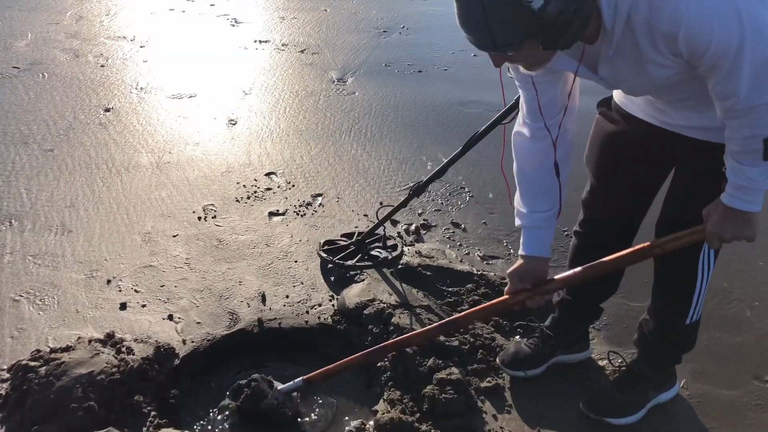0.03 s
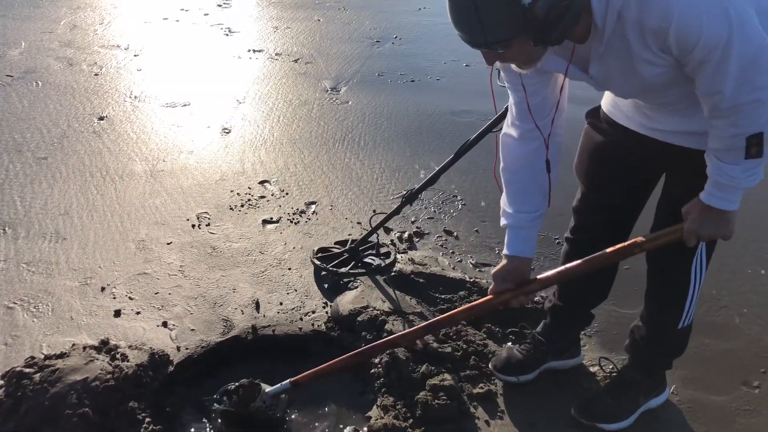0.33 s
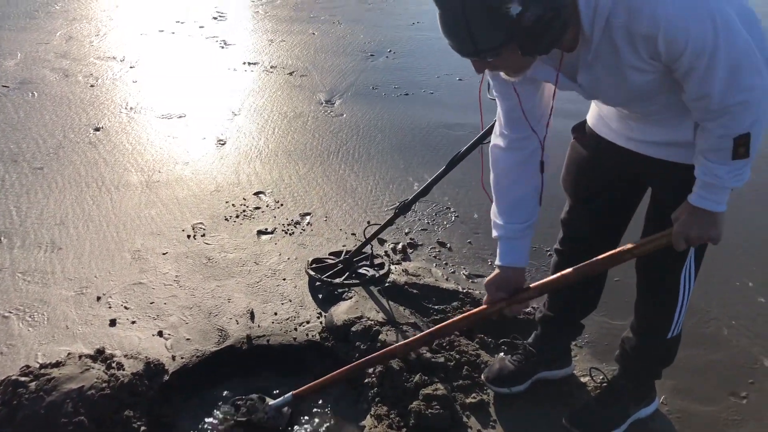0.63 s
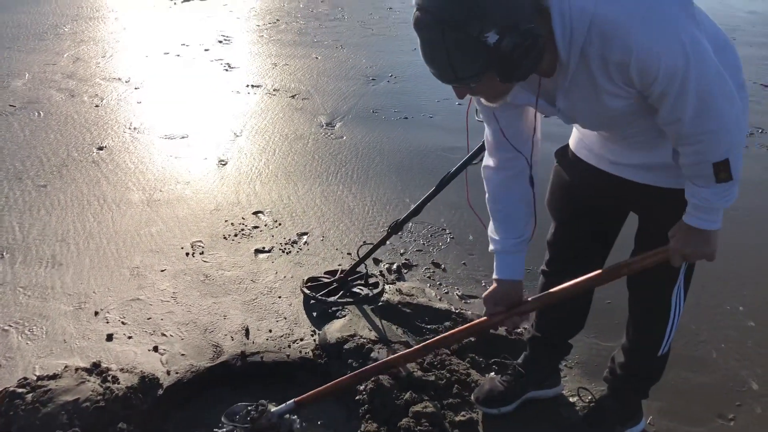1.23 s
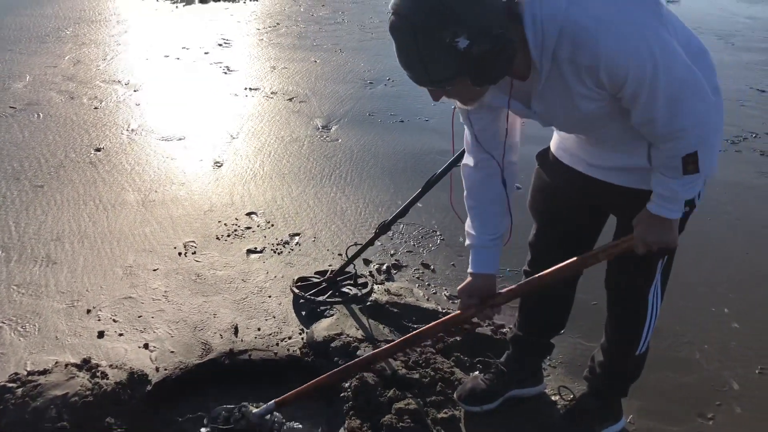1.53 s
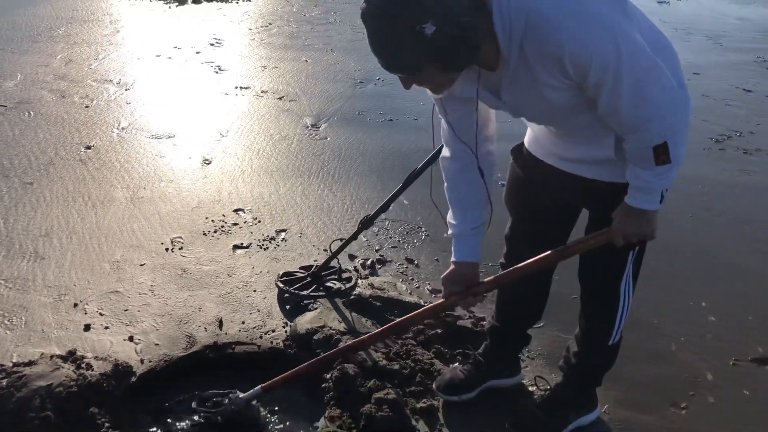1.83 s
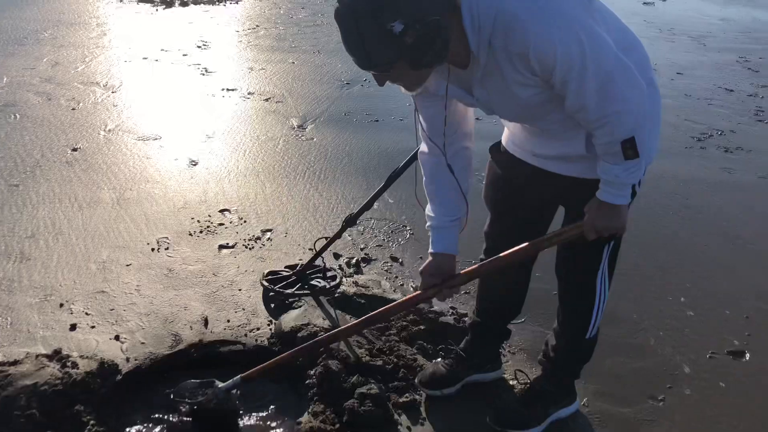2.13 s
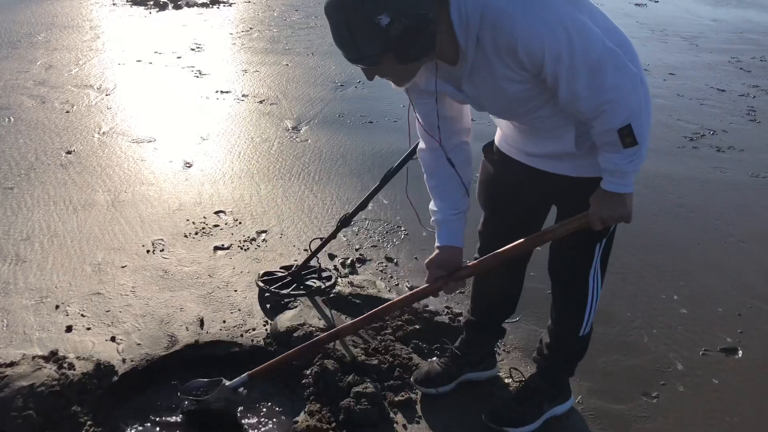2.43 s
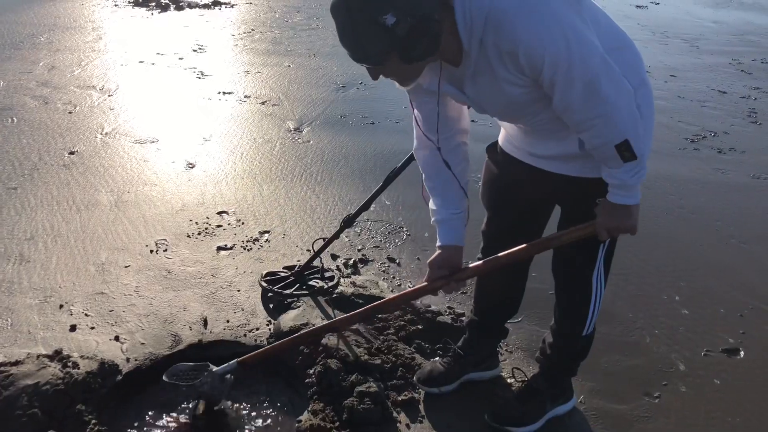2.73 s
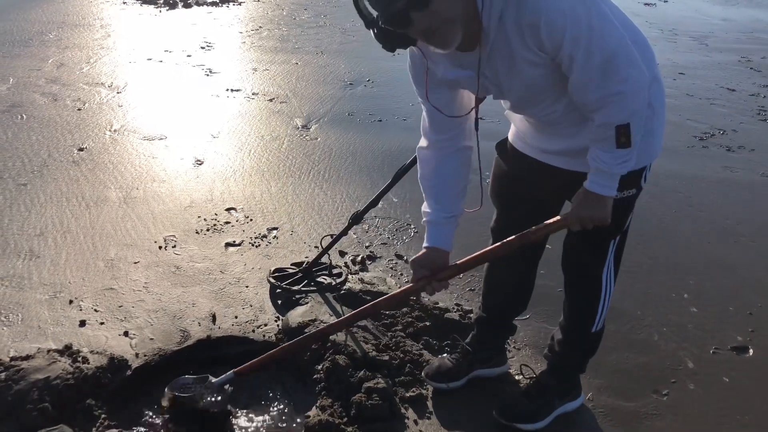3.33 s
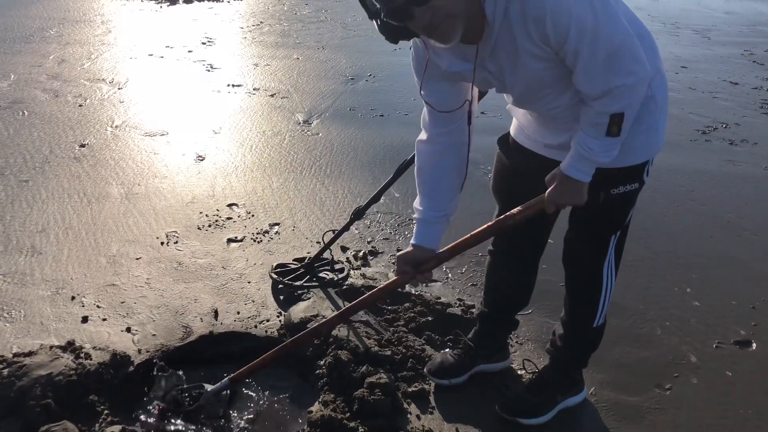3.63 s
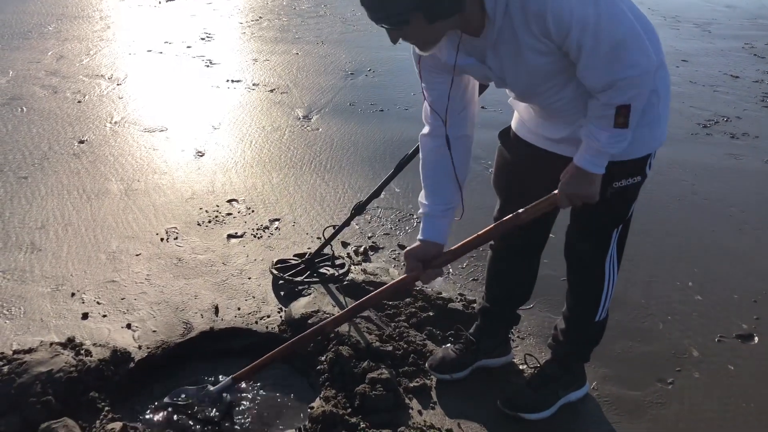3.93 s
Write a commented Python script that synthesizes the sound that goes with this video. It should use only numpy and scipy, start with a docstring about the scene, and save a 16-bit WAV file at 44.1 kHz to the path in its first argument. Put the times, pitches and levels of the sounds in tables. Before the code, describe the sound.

A scoop sloshes in a water-filled sand hole while wind buffets the microphone.

```python
"""On a beach, a long-handled scoop is shaken in a water-filled hole, about three strokes a second.
Each stroke throws a slosh of water and wet sand, made of hiss and tiny ringing bubbles.
Drops fall back into the puddle, and the scoop dribbles between strokes.
Gusts of wind rumble and thump on the microphone; surf washes steadily in the distance."""
import sys
import numpy as np
from scipy import signal
from scipy.fft import rfft, irfft
from scipy.io import wavfile
from scipy.ndimage import uniform_filter1d, minimum_filter1d

SR = 44100
rng = np.random.default_rng(int(sys.argv[2]) if len(sys.argv) > 2 else 0)


def transcribe(u):
    """Save the signal u as a 16-bit wav file named by the first command-line argument.

    u: samples, shape (n,) or (channels, n), limited to [-1, 1]; the rate is SR.
    q: integer samples, one column per channel.
    """
    v = np.clip(np.atleast_2d(u).T, -1, 1)
    q = np.round(v * 32767).astype(np.int16)
    wavfile.write(sys.argv[1], SR, q)


N = 176400

# swirls of air that hit the microphone: (time [s], level [dB], rough starting pitch [Hz])
WIND_HITS = [(.154, -9, 858), (0.254, -11.5, 877), (.283, -10, 674), (.294, -10, 823), (0.33, -4, 1610),
             (.382, -14, 816), (0.428, -9, 900), (.45, -8, 1020), (0.569, -11, 690), (.649, -13.5, 723),
             (.868, -9.5, 455), (1.013, -11, 850), (1.063, -13, 856), (1.281, -12, 606), (1.331, -17, 700),
             (1.368, -13, 975), (1.417, -14, 753), (2.496, -13, 633), (3.213, -6.5, 1083),
             (3.265, -15, 798), (3.319, -8.5, 843), (3.338, -14.5, 805), (3.363, -12, 794),
             (3.385, -9.5, 888), (3.479, -8.5, 875), (3.539, -6.5, 1314), (3.56, -14, 756),
             (3.58, -10.5, 724), (3.645, -9, 1017), (3.678, -3.5, 1530), (3.714, -6.5, 975),
             (3.735, -4, 1164), (3.759, -10, 1055), (3.861, -10, 730), (3.896, -8.5, 1176),
             (3.945, 4.5, 1192), (3.99, -10, 906)]
# tone of splashing water and wet sand: (frequency [Hz], level [dB])
SPLASH_TONE = [(300, -34), (900, -1), (1500, -2.5), (2300, -3.5), (3200, -2.5), (4700, 0), (6700, -4.5),
               (8500, -12.5), (11000, -19.5), (16000, -15)]


def undb(db):
    """Turn decibels into a number to multiply by."""
    return np.exp(np.asarray(db) * (np.log(10) / 20))


def unit(x):
    """Scale a signal to an average strength (rms) of 1."""
    return x / np.sqrt(np.mean(x ** 2) + 1e-20)


def curve(rows):
    """Join rows of (time [s], value) with straight lines."""
    return np.interp(np.arange(N) / SR, *np.array(rows).T)


def colour(x, points):
    """Give a sound the tone in rows of (frequency [Hz], level [dB]), at strength 1."""
    hz, db = np.array(points).T
    log_hz = np.log(np.arange(N // 2 + 1) * SR / N + 1)
    log_gain = np.interp(log_hz, np.log(hz), db) * np.log(10) / 20
    # these steps make the filter ring after a click, not before it
    cepstrum = irfft(log_gain, N)
    cepstrum[1:N // 2] *= 2
    cepstrum[N // 2 + 1:] = 0
    return unit(irfft(rfft(x) * np.exp(rfft(cepstrum)), N))


def wander(rate):
    """A random drift of strength 1 that heads for a new value `rate` times a second."""
    hold = max(int(SR / rate), 2)
    steps = rng.standard_normal(N // 20)
    return unit(uniform_filter1d(steps[np.arange(N) // hold % len(steps)], hold))


def add(out, start, sound):
    """Mix a short sound in at a time in seconds."""
    i = int(np.clip(start * SR, 0, N - 1))
    out[i:i + len(sound)] += sound[:N - i]


def wind():
    """Gusts press on the microphone as a low rumble, while small swirls of air flutter above it."""
    # how strong each part is: (time [s], level [dB])
    gust_levels = [(0, -19), (.13, -19), (.2, -22), (.45, -20.5), (.56, -23.5), (.75, -20), (.83, -32.5),
                   (.87, -20), (.96, -26.5), (1.02, -21.5), (1.15, -22.5), (1.24, -17.5), (1.3, -24.5),
                   (1.58, -20.5), (1.68, -29.5), (1.94, -25), (2.03, -39), (2.13, -40), (2.19, -23.5),
                   (2.31, -28), (2.37, -33), (2.42, -28), (2.51, -19.5), (2.55, -34.5), (2.9, -42),
                   (3.1, -29), (3.27, -19), (3.47, -19), (3.55, -17.5), (3.6, -20), (3.72, -12.5),
                   (3.83, -22), (3.95, -14.5)]
    flutter_levels = [(0, -33), (.08, -27), (.2, -36), (.3, -22), (.45, -27.5), (.52, -27.5), (.66, -29.5),
                      (.8, -38.5), (.97, -47), (1.02, -28.5), (1.13, -28), (1.22, -26.5), (1.36, -27),
                      (1.58, -34), (1.66, -37), (1.9, -47), (2.1, -56), (2.36, -50), (2.5, -28),
                      (2.56, -43), (2.9, -47), (3.01, -31), (3.17, -46), (3.3, -34), (3.72, -24),
                      (3.83, -23.5), (3.9, -50), (4, -13)]
    # tone of each part: (frequency [Hz], level [dB])
    rumble_tone = [(15, -57.5), (25, -35.5), (42, -9), (70, -0.5), (115, -3), (170, -6.5), (260, -19),
                   (400, -31), (800, -81.5)]
    flutter_tone = [(80, -29), (170, 3), (260, 6), (450, -7.5), (700, -18), (1000, -33), (1600, -47),
                    (3000, -65)]
    rumble = colour(rng.standard_normal(N), rumble_tone) * unit(undb(1.37 * wander(18)))
    flutter = colour(rng.standard_normal(N) * undb(4 * wander(70)), flutter_tone)
    return undb(curve(gust_levels) + 1.5) * rumble + undb(curve(flutter_levels) + 0.5) * flutter


def surf():
    """Faraway breaking waves blend into a smooth wash."""
    # tone of the waves: (frequency [Hz], level [dB])
    surf_tone = [(30, -25), (70, -3.5), (220, 2), (480, -7), (950, -12.5), (1400, -17.5), (2000, -25),
                 (3200, -36), (6000, -52.5), (10000, -55.5), (16000, -53.5)]
    return colour(rng.standard_normal(N), surf_tone) * undb(-36.5 + .5 * wander(0.65))


def sand_grains(per_s):
    """Grains of sand make random clicks of uneven size."""
    clicks = (rng.random(N) < per_s / SR) * rng.choice([-1, 1], N)
    return unit(clicks * undb(-np.minimum(rng.exponential(size=N), 3)))


def bubble(hz, cycles):
    """A pocket of air rings and rises a little in pitch, fading to about a third in `cycles` swings."""
    glide = 0.02
    age = np.arange(int(6 * cycles / hz * SR) + 2) / SR * hz / cycles
    onset = 1 - np.exp(-1.5 * age * cycles)
    return onset * np.exp(-age) * np.sin(2 * np.pi * cycles * age * (1 + glide * age / 2))


def bubbles(per_s, low_hz, high_hz, cycles, spread_db):
    """Many bubbles of random size ring at random times, together at strength 1."""
    out = np.zeros(N)
    for when, pitch, size, ring in rng.random((int(per_s * N / SR), 4)):
        strength = undb(spread_db * min(-np.log(1 - size), 3))
        hz = low_hz * (high_hz / low_hz) ** pitch
        add(out, when * N / SR, strength * bubble(hz, cycles * (.5 + ring)))
    return unit(out)


def sloshes():
    """Each stroke swells and dies away in clumps of spray, sand and bubbles, with a hollow squelch."""
    # strokes of the scoop: (loudest moment [s], rise [s], fall [s], level [dB],
    # treble tilt [dB per octave], squelch pitch [Hz])
    strokes = [(.14, 0.042, 0.045, -42, -1, 6800), (.52, 0.019, 0.028, -44.5, 1, 4800),
               (0.881, 0.033, 0.019, -32, 0.5, 4370), (1.215, 0.031, 0.036, -40, -1, 3000),
               (1.526, 0.057, 0.036, -40, -0.5, 2410), (1.82, 0.019, 0.06, -38.5, -0.5, 2100),
               (2.17, .042, 0.016, -42.5, 0.5, 2600), (2.436, 0.012, 0.044, -40.5, -1, 2920),
               (2.82, 0.046, 0.035, -36.5, 2.5, 5200), (2.834, 0.0087, .012, -22.5, -1.5, 2800),
               (3.115, 0.045, 0.035, -43, -3, 4530), (3.172, 0.035, 0.033, -39, 1, 2480),
               (3.473, .018, 0.018, -39, -3, 1900), (3.59, 0.036, 0.013, -50, 0.5, 2800)]
    squelch_db, squelch_octaves, roundness = 3.5, 0.32, 2.02
    t, out = np.arange(N) / SR, np.zeros(N)
    spray = undb(-12.5) * rng.standard_normal(N) + undb(-8) * sand_grains(per_s=1200)
    froth = undb(-11) * bubbles(per_s=700, low_hz=1700, high_hz=8000, cycles=3, spread_db=5)
    pops = undb(-12.5) * bubbles(per_s=220, low_hz=1900, high_hz=6500, cycles=7, spread_db=4)
    grit = undb(-21.5) * bubbles(per_s=380, low_hz=7000, high_hz=14000, cycles=5, spread_db=5.5)
    clumps = unit(undb(3.5 * wander(170)))
    water = (np.std(spray) * colour(spray, SPLASH_TONE) + froth) * clumps + pops + grit
    spectrum = rfft(water)
    octave = np.log2(np.arange(N // 2 + 1) * SR / N + 1)
    tilt_octaves = np.maximum(octave - np.log2(4000), -2)  # the tilt pivots at 4000 Hz
    for crest, rise, fall, db, tilt_db, hz in strokes:
        from_crest = np.maximum((crest - t) / rise, (t - crest) / fall)
        swell = np.exp(-np.clip(from_crest, 0, 10) ** roundness)
        squelch = np.exp(-np.minimum(((octave - np.log2(hz)) / squelch_octaves) ** 2, 20))
        tone = undb(tilt_db * tilt_octaves + squelch_db * squelch)
        out += undb(db) * swell * irfft(spectrum * tone, N)
    return out


def thumps():
    """A strong swirl of air is a few uneven pushes: small and fast at first, then slower and wider."""
    rise_s, glide_s, end_hz, muffle_hz = 0.0062, 0.004643, 132, 632
    out, t = np.zeros(N), np.arange(SR // 25) / SR
    age = t / rise_s
    swell = (age * np.exp(1 - age)) ** 2
    uneven = np.exp(.33 * wander(900))
    for k, (when, db, hz) in enumerate(WIND_HITS):
        falling = end_hz + (hz - end_hz) * np.exp(-t / glide_s)
        pitch = falling * uneven[k * len(t):(k + 1) * len(t)]
        swings = np.sin(2 * np.pi * (np.cumsum(pitch) / SR + rng.random()))
        add(out, when, undb(db - 2.5) * swell * swings)
    frequencies = np.arange(N // 2 + 1) * SR / N
    return irfft(rfft(out) / (1 + (frequencies / muffle_hz) ** 3), N)


def snaps():
    """The hardest swirls of air break up into a short, ragged snap at their front edge."""
    # tone of a snap: (frequency [Hz], level [dB])
    snap_tone = [(200, -13.5), (500, -2.5), (900, 7.5), (1300, -4), (1800, -23.5), (3000, -39), (6000, -94)]
    rise_s, growth = 0.0035, 1.57  # growth above 1 favours the hardest hits
    loudness, age = np.zeros(N), np.arange(SR // 25) / SR / rise_s
    swell = (age * np.exp(1 - age)) ** 2
    for when, db, _ in WIND_HITS:
        add(loudness, when, undb(growth * db - 24.5) * swell)
    return loudness * colour(rng.standard_normal(N), snap_tone)


def drops():
    """A large drop lands with a short splat and traps a bubble, which rings near the same pitch."""
    # drops and lumps that hit the puddle: (time [s], level [dB], pitch [Hz])
    landings = [(.157, -38, 5440), (0.974, -35, 4440), (0.984, -28.5, 4520), (1.028, -36.5, 3960),
                (1.053, -27.5, 2550), (1.16, -35, 4100), (1.531, -32, 2630), (1.548, -27.5, 2250),
                (1.804, -36, 4460), (1.886, -25.5, 5400), (1.892, -27, 3600), (1.898, -38, 10500),
                (1.96, -28, 3930), (1.973, -26, 2660), (2.168, -30.5, 7000), (2.181, -28, 2390),
                (2.273, -36, 5900), (2.43, -32.5, 2760), (2.438, -28, 2690), (2.488, -27.5, 6400),
                (2.81, -17.5, 980), (2.928, -34.5, 5100), (3.165, -26.5, 2330), (3.2, -20.5, 4910),
                (3.523, -22, 6450), (3.526, -42, 11000), (3.545, -38, 9000), (3.567, -26, 4670),
                (3.595, -30, 2700), (3.758, -34, 2410), (3.834, -35.5, 5140)]
    splat_fade_s = 0.0032
    out, t = np.zeros(N), np.arange(SR // 40) / SR
    for when, db, hz in landings:
        band = signal.butter(2, [hz * 0.56, min(hz * 1.22, SR / 3)], "band", fs=SR, output="sos")
        splat = unit(signal.sosfilt(band, rng.standard_normal(len(t))))
        add(out, when, undb(db - 4) * bubble(hz, cycles=5.8))
        add(out, when, undb(db - 10.5) * np.exp(-t / splat_fade_s) * splat)
    return out


def trickle():
    """Between strokes the scoop dribbles: tiny bubbles, crackling wet sand, ticks and a soft seep."""
    # water draining from the scoop: (time [s], level [dB])
    drain_levels = [(0, -94), (.26, -52.5), (.42, -81), (.56, -62.5), (.8, -60.5), (.95, -58.5),
                    (1.3, -53.5), (1.42, -57), (1.66, -54.5), (1.93, -53.5), (2.06, -59), (2.26, -49.5),
                    (2.39, -65.5), (2.53, -49), (2.68, -62), (2.9, -48), (3.03, -60), (3.23, -54),
                    (3.4, -63), (3.55, -50), (3.66, -59.5), (4, -58)]
    # tone of the ticks: (frequency [Hz], level [dB])
    tick_tone = [(1500, -14), (4500, 0), (7000, -2), (10000, -5), (16000, -5)]
    drips = undb(-9.5) * bubbles(per_s=200, low_hz=2500, high_hz=8500, cycles=7, spread_db=4.5)
    crackle = bubbles(per_s=420, low_hz=2500, high_hz=15000, cycles=3, spread_db=5)
    crackle = undb(-10.5) * colour(crackle, SPLASH_TONE)
    ticks = bubbles(per_s=70, low_hz=5000, high_hz=15000, cycles=2.5, spread_db=5)
    ticks = undb(-15) * colour(ticks, tick_tone)
    seep = undb(-7.5) * colour(rng.standard_normal(N) * undb(3 * wander(120)), SPLASH_TONE)
    return undb(curve(drain_levels)) * (drips + crackle + ticks + seep)


def scene():
    """The scoop and the puddle, with wind and surf, in one channel."""
    return (sloshes() + trickle() + drops() + wind() + thumps() + snaps() + surf())[None, :]


def record(dry):
    """A limiter gently turns down the loudest peaks, and the highest treble is cut away."""
    ceiling, top_hz, window = .92, 15850, SR // 100
    needed_gain = np.minimum(1, ceiling / (np.abs(dry) + 1e-9))
    held_gain = minimum_filter1d(needed_gain, 2 * window)
    smooth_gain = uniform_filter1d(uniform_filter1d(held_gain, window), window)
    treble_cut = signal.ellip(10, .2, 80, top_hz, fs=SR, output="sos")
    return signal.sosfilt(treble_cut, dry * smooth_gain)


dry = scene()
out = record(dry)
transcribe(out)
```